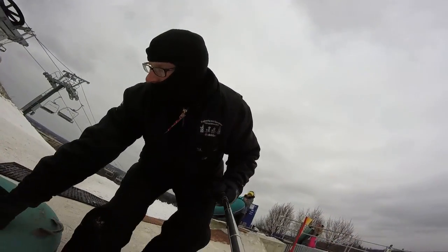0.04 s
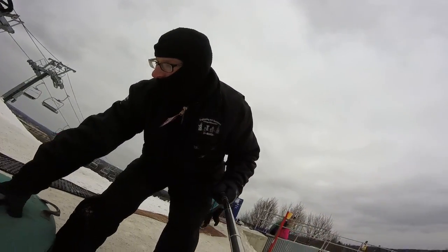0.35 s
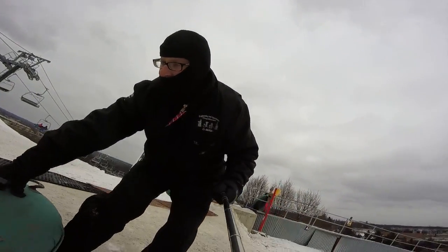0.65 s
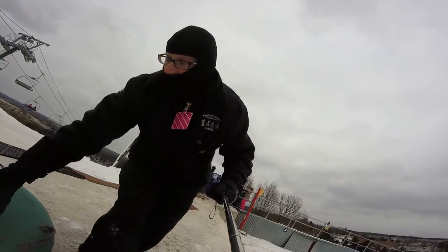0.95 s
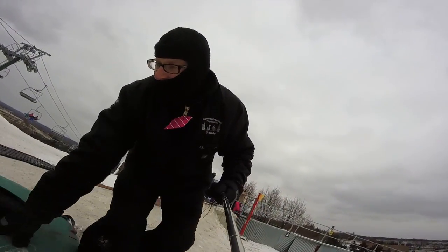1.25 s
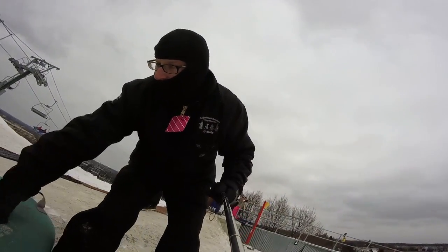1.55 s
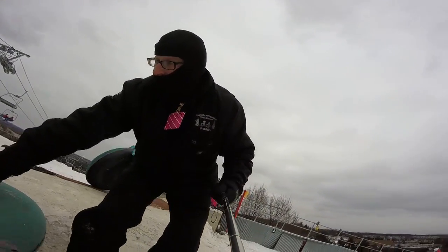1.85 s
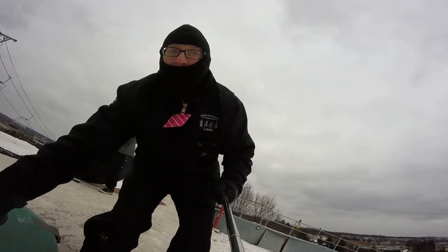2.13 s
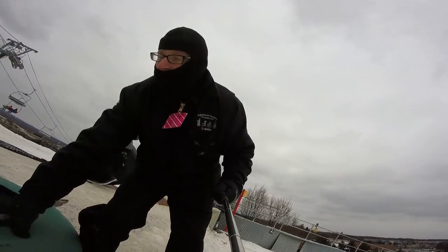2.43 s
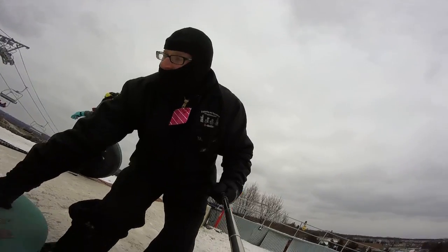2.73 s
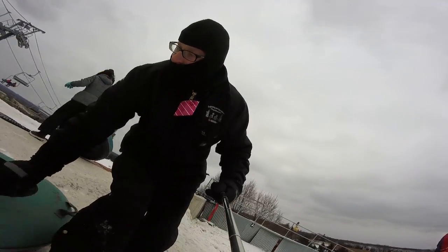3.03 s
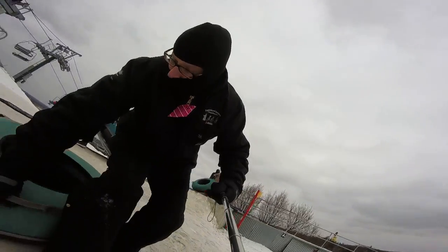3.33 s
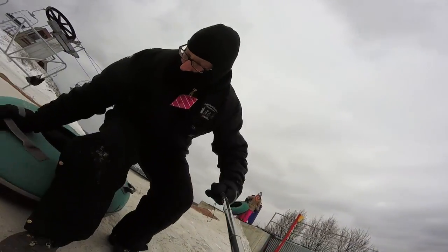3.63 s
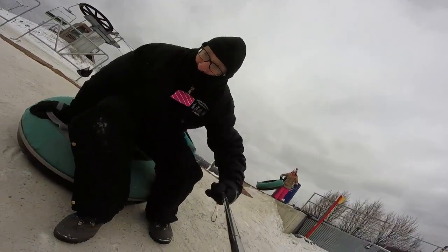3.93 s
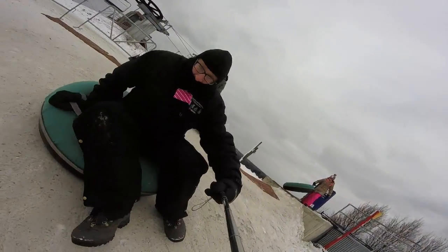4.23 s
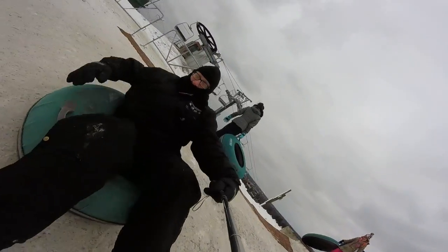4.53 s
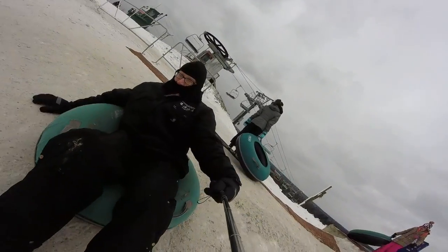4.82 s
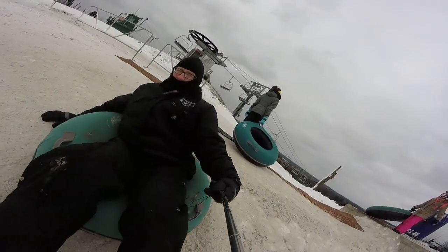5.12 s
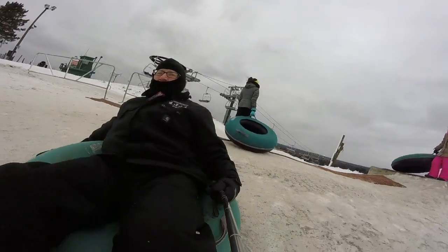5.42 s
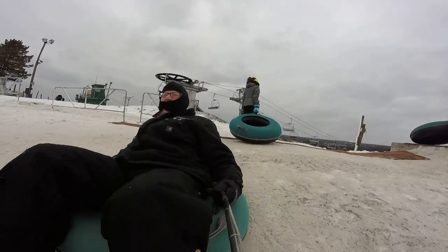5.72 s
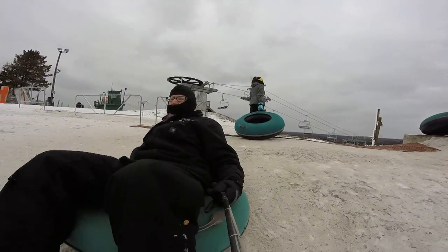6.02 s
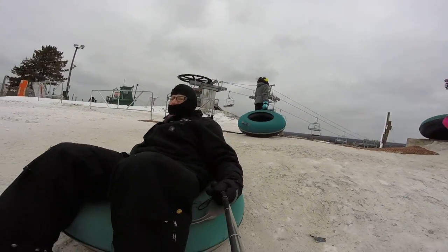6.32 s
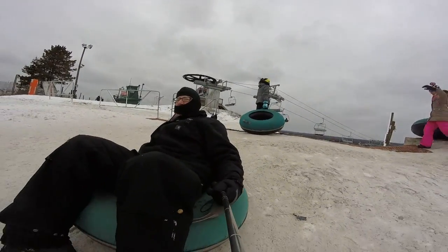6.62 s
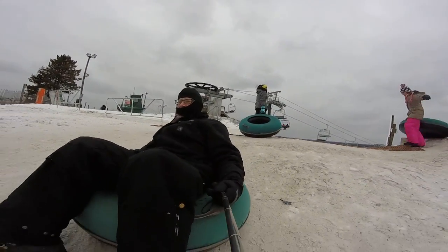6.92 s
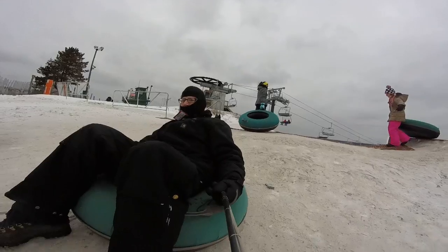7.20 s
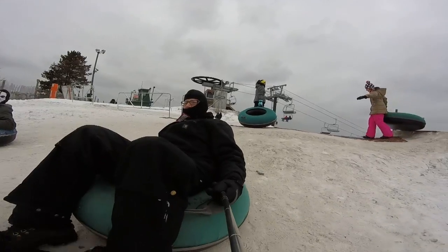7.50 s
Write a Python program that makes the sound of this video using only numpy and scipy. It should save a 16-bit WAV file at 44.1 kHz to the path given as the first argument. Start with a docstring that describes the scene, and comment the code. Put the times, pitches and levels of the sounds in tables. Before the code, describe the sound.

Boots crunch unevenly over packed snow close to the microphone, with crisp cracks of icy crust. The steps thin out, a handheld pole knocks and a snow suit rustles. A snow tube then rasps and groans under the rider's weight, thumps a few times and slides off with a grainy scrape. Wind rumbles on the microphone throughout, and a distant lift whines faintly in the first half.

```python
"""Boots crunch over packed snow, its crust fracturing in grains, as a rider pulls a snow tube along.
The rider sits down and pushes off: the tube's skin judders by stick-slip friction, then the tube glides
with a grainy hiss. The pole that carries the camera knocks and shudders in its bending mode, wind
rumbles and a distant lift whines. The camera's case resonates near 1.6 kHz and colours every noise."""
import sys
import numpy as np
from scipy.fft import rfft, irfft, next_fast_len
from scipy.io import wavfile
from scipy.ndimage import map_coordinates

SR = 44100
rng = np.random.default_rng(int(sys.argv[2]) if len(sys.argv) > 2 else 0)


def to_wav(sig):
    """Store sig (one row per channel, or 1-D mono) as 16-bit WAV at the path in sys.argv[1].

    Samples outside -1..1 are clipped; the rate is SR.
    """
    pcm = np.clip(np.atleast_2d(sig), -1, 1) * 32767
    pcm = np.round(pcm).astype(np.int16)
    wavfile.write(sys.argv[1], SR, pcm.T)  # frames by channels


N = 337665
TIME = np.arange(N) / SR
STEP_PRESS_S = 0.0068  # every step presses alike

# boot crunches: t/s, relative peak/dB, heel thud/dB, brightness/dB, rise/s
STEPS = [(0.393, -40, -8.5, -7, 0.0043), (0.49, -43.5, -14, -25, .007), (0.762, -41, -29, -14, .003),
         (0.84, -51, -19, -12, 0.011), (0.925, -45, -14, -8, .015), (0.97, -28.5, -3, -7.5, 0.0043),
         (0.998, -44, -8, -24, 0.0033), (1.024, -34.5, -25, -12, 0.0083), (1.12, -38, -25, -1, 0.011),
         (1.178, -43.5, -6, 1, 0.0075), (1.221, -34, -23, -6.5, 0.0085), (1.254, -42, -20, -8, .004),
         (1.275, -34.5, -6, -18, .002), (1.284, -42, -26, -10, 0.0027), (1.3, -40.5, -3, -16, 0.0076),
         (1.463, -33.5, -7, -11, .013), (1.577, -46.5, -16, -4, .006), (1.719, -46, -19, -3, 0.0055),
         (1.782, -36.5, -24, -14, .011), (1.86, -36, -17, -20, 0.0026), (1.904, -46, -20, -16, 0.0026),
         (1.944, -43.5, -21, -7, 0.0081), (1.965, -46, -20, -8, 0.0067), (2.026, -34.5, 0.5, -17, 0.0045),
         (2.038, -42, -5, 1, .005), (2.244, -30, -13, -15, 0.0023), (2.349, -36.5, -5, -22, 0.0032),
         (2.363, -32.5, -6, -9, .005), (2.41, -51.5, 3, 6, .004), (2.443, -50, -7, 0, .005),
         (2.452, -34.5, -8, -22, 0.0047), (3.315, -48.5, 3, -7, .005), (3.533, -45, 3.5, -15, .003),
         (3.83, -68, 5, -20, .004), (3.9, -64, 10, -27, .004), (4.413, -32.5, -31, -25, 0.0023)]
# spectra ahead of the case: f/Hz, relative level/dB
CRUNCH_SPECTRUM = [(150, 2.5), (420, 0.5), (600, -5), (820, -4), (1150, -6.5), (1500, 1.5), (1900, 2.5),
                   (2700, -1), (4000, -9.5), (6000, -21.5), (12000, -37)]  # coarse grains
CRYSTAL_SPECTRUM = [(1500, -13.5), (3000, 3), (4400, 1), (5400, -9), (6300, -6), (7100, -14), (8500, -10),
                    (10500, -12), (15000, -26)]  # loose snow crystals
LUMP_SPECTRUM = [(150, 11), (450, 0), (700, -4), (1100, -3), (1550, 1), (2000, -2.5), (2600, -7.5),
                 (3500, -4), (6000, -23), (14000, -40)]  # hard bits under the tube
RUMBLE_SPECTRUM = [(15, 6), (30, -9), (55, 2.5), (90, -7), (140, -12.5), (250, -14.5), (450, -21),
                   (900, -31), (3000, -58), (9000, -99)]  # low rumble of wind and tube


def boots(crunch_db=-10, crisp_db=-11, heel_db=-12, brush_db=-22, brush_s=0.038, tail_db=-15):
    """Brittle fracture: the sole brushes the snow, then breaks the crust in grains over a dull thud."""
    # heel impact: f/Hz, relative level/dB
    heel_spectrum = [(40, 13), (80, -17), (120, 3), (170, -2.5), (240, -6.5), (450, -1), (900, -9.5),
                     (2000, -38), (8000, -79)]
    sink_s, tail_t60 = 0.0025, 0.066
    crush, trickle, heel = np.zeros((3, N))
    for s, db, thud_db, bright_db, rise in STEPS:
        hold = rise + STEP_PRESS_S / 2
        brush = amp(brush_db) * burst(s - brush_s, brush_s, brush_s, tail_t60 / 3)
        loose = np.maximum(brush, amp(tail_db) * burst(s, rise, hold, tail_t60))
        crush += amp(db) * np.maximum(burst(s, rise, hold, t60=0.077), loose)
        trickle += amp(db + bright_db) * np.maximum(burst(s, rise, hold, t60=0.1), loose)
        heel += amp(db + thud_db) * burst(s, sink_s, 2 * sink_s, t60=0.21)
    crumble = amp(1.5 * wobble(350))  # the crust gives way in small collapses
    crust = amp(crunch_db) * crush * crumble * grains(rate=2200, spread_db=2.5)
    crystals = amp(crisp_db) * trickle * crumble * grains(rate=6000, spread_db=2.5)
    thud = through_case(amp(heel_db) * heel * rng.standard_normal(N), heel_spectrum)
    return through_case(crust, CRUNCH_SPECTRUM) + through_case(crystals, CRYSTAL_SPECTRUM) + thud


def crust_snaps(level_db=-7):
    """Sudden release of strain: a plate of ice breaks with one short, bright crack."""
    # breaks: t/s, relative peak/dB
    breaks = [(0.972, -26), (1.033, -36), (1.275, -37), (1.404, -27.5), (1.478, -35.5), (1.992, -38),
              (2.03, -35), (2.045, -41), (2.249, -30.5), (2.354, -32), (2.37, -34.5), (2.411, -36),
              (2.457, -35.5), (4.641, -36.5), (6.1053, -36)]
    # crack: f/Hz, relative level/dB
    spectrum = [(500, -11), (1500, 4.5), (2900, 9), (4500, 0.5), (7000, -12), (10000, -14), (15000, -46)]
    force = sum(amp(db) * burst(s, rise=0.0012, hold=0.00022, t60=0.019) for s, db in breaks)
    return amp(level_db) * through_case(force * rng.standard_normal(N), spectrum)


def footfalls(thud_hz=135.8, thud_rise_s=0.0032, packing_db=-10, grit_db=-23):
    """Compaction: each step packs the snow with a low thud, and loose grit crackles on after it."""
    weight, scatter = np.zeros((2, N))
    for s, db, thud_db, bright_db, rise in STEPS:
        weight += amp(db + thud_db) * burst(s, thud_rise_s, 2 * thud_rise_s, t60=0.34)
        scatter += amp(db + bright_db / 2) * burst(s, rise, rise + STEP_PRESS_S, t60=0.2)
    thud = amp(packing_db) * weight * sine(thud_hz * np.exp(0.19 * wobble(60)))
    grit = amp(grit_db) * scatter * grains(rate=330, spread_db=-0.5)
    return thud + through_case(grit, CRYSTAL_SPECTRUM)


def skin_rub(slip_hz=622.6, scatter=0.24, wander=0.2, grit=0.43, echo_s=0.0009, rumble_db=-1):
    """Stick-slip friction: the loaded skin rasps unevenly, and the hollow tube groans and rumbles."""
    # short rubs: t/s, level/dB, length/s, relative groan/dB
    rubs = [(4.43, -56, .06, -22), (4.476, -52, 0.02, -3), (4.807, -54.5, 0.07, -27),
            (5.151, -47, 0.022, -2), (5.18, -46, 0.017, 0), (5.208, -39, 0.012, -5),
            (5.225, -35, 0.0042, -20), (5.252, -44, 0.0054, -4), (5.262, -39.5, 0.006, -9),
            (5.29, -52, 0.012, -3), (5.337, -52.5, 0.046, -6), (5.42, -38.5, .004, -3),
            (5.573, -41, 0.0046, -14), (5.9, -61, 0.15, 1)]
    # long rub as the rider settles and shoves off: t/s, level/dB
    shove = [(5.385, -49.5), (5.42, -37), (5.445, -36), (5.52, -37.5), (5.545, -37), (5.58, -36.5),
             (5.62, -40), (5.65, -44), (5.675, -56)]
    # rasping skin and hollow interior: f/Hz, relative level/dB
    skin_spectrum = [(50, -6), (90, 17.5), (190, -0.5), (330, 4), (470, 3.5), (620, 1), (850, -12.5),
                     (1050, -6.5), (1400, -0.5), (1620, 4), (1780, -5), (2050, 5), (2400, -4.5), (2800, -5),
                     (3200, -20.5), (3750, -12), (5200, -46), (14000, -56)]
    groan_spectrum = [(150, -25), (280, -7), (400, -2), (490, 1.5), (600, -15.5), (750, -18), (1000, -42),
                      (5000, -74)]
    pressure, hollow = np.zeros((2, N))
    for s, db, length, groan_db in rubs:
        # a longer rub builds and lets go more slowly
        stroke = amp(db) * burst(s, rise=0.0043 + 0.081 * length, hold=length, t60=0.064 + 0.57 * length)
        pressure = np.hypot(pressure, stroke)
        hollow = np.hypot(hollow, amp(groan_db) * stroke)
    pressure = np.hypot(pressure, swell(shove))
    cycles = np.cumsum(slip_hz * np.exp(scatter * wobble(900) + wander * wobble(60))) / SR
    slips = np.diff(np.floor(cycles), prepend=0) * amp(2 * rng.standard_normal(N))
    friction = unit(unit(slips - slips.mean()) + grit * rng.standard_normal(N))
    # the rubbed patch echoes between its edges; the delay shifts as it changes size
    delay = echo_s * np.exp(0.2 * wobble(25))
    friction = unit(friction + 0.35 * np.interp(TIME - delay, TIME, friction))
    judder = amp(wobble(130))
    rasp = judder * through_case(pressure * friction, skin_spectrum)
    rumble = amp(rumble_db) * through_case(pressure * rng.standard_normal(N), RUMBLE_SPECTRUM)
    groan = through_case(hollow * rng.standard_normal(N), groan_spectrum)
    return rasp + rumble + groan


def tube_bumps(air_hz=94, thump_db=-3, flap_db=-10):
    """Cavity resonance: a bump rings the air in the tube for a few cycles and flaps its cover."""
    # tube against pole: t/s, relative peak/dB
    bumps = [(0.998, -47), (2.077, -40), (4.391, -38.5), (5.338, -27.5), (5.382, -28), (5.9, -50),
             (6.006, -25), (6.06, -26)]
    # flapping cover: f/Hz, relative level/dB
    spectrum = [(40, -7), (85, 12), (160, -5), (300, -9.5), (470, -17), (700, -49), (2000, -24.5),
                (8000, -67)]
    thumps, flaps = np.zeros((2, N))
    for s, db in bumps:
        air_mode = np.sin(2 * np.pi * air_hz * (TIME - s))
        thumps += amp(db) * burst(s, rise=0.0045, hold=0, t60=0.13) * air_mode
        flaps += amp(db) * burst(s, rise=0.0038, hold=0, t60=0.079)
    return amp(thump_db) * thumps + amp(flap_db) * through_case(flaps * rng.standard_normal(N), spectrum)


def tube_slide(push_off_s=5.57, gather_s=0.95, scrape_db=-3, powder_db=-67, glide_db=-62):
    """Sliding friction on snow: a coarse scrape, a fine hiss, and a sheen as the tube gathers speed."""
    # drag while pulled along, halted, then gliding: t/s, relative level/dB
    drag_levels = [(0, -58), (.7, -60), (.95, -51.5), (1.1, -58.5), (1.95, -56), (2.6, -57.5), (3.4, -59),
                   (3.95, -65), (4.4, -51.5), (4.58, -61.5), (5.1, -56.5), (5.3, -53), (6.15, -55),
                   (6.9, -57.5), (7.66, -55.5)]
    # scrape, hiss and sheen: f/Hz, relative level/dB
    scrape_spectrum = [(150, 5.5), (400, -5.5), (800, 0), (1300, -1), (1700, 4), (2300, 0), (3200, -5.5),
                       (4500, -13), (8000, -33.5)]
    powder_spectrum = [(1500, -21), (3000, 4.5), (4300, 2.5), (5400, -2.5), (6300, -7.5), (7100, -5.5),
                       (8500, -5.5), (10500, -11.5), (15000, -27.5)]
    glide_spectrum = [(150, 5), (380, 8.5), (700, -3.5), (1100, 2), (1600, -6), (3300, 0.5), (5000, -12),
                      (6200, -11), (7200, -25), (9000, -16), (15000, -45)]
    drag = swell(drag_levels)
    powder = unit(drag ** 0.25)  # grows by 1 dB for 4 dB of drag
    clumps = amp(1.08 * wobble(60))
    speed = np.clip((TIME - push_off_s) / gather_s, 0, 1)
    coarse = through_case(drag * clumps * grains(rate=2500, spread_db=1.5), scrape_spectrum)
    fine = through_case(powder * clumps * grains(rate=8000, spread_db=2.5), powder_spectrum)
    sheen = through_case(speed * clumps * grains(rate=8000, spread_db=2), glide_spectrum)
    return amp(scrape_db) * coarse + amp(powder_db) * fine + amp(glide_db) * sheen


def pole_knocks(blow_db=12, chatter_db=-9):
    """Structure-borne sound: a hard blow and its brief chatter travel up the pole into the case."""
    # knocks on handle and pole: t/s, relative peak/dB
    knocks = [(2.028, -39.5), (2.461, -34), (3.478, -32), (3.96, -46), (4.417, -36), (4.497, -35.5),
              (4.663, -26.5), (4.686, -41)]
    # struck pole: f/Hz, relative level/dB
    spectrum = [(150, -19), (500, -7), (720, 2.5), (930, -11), (1200, -2), (1550, 3), (1950, 5.5),
                (2700, -5), (3300, -18), (4000, -16), (6000, -48), (14000, -41)]
    blows, chatter = np.zeros((2, N))
    for s, db in knocks:
        blows[round(s * SR)] = amp(db + blow_db)
        chatter += amp(db + chatter_db) * burst(s, rise=0.00049, hold=0.00026, t60=0.029)
    return through_case(blows + chatter * rng.standard_normal(N), spectrum)


def pole_shudder(sway_hz=32, wander=0.099, tremble_db=-1.5, flex_hz=54, flex_db=-12):
    """Bending vibration: the pole trembles in its lowest mode; jolts swing it and flex its mount."""
    # jolts: t/s, peak/dB, length/s
    jolts = [(0.263, -44.5, 0.15), (0.59, -40, 0.34), (1.007, -41, 0.24), (1.768, -43, 0.16),
             (2.048, -43.5, 0.23), (4.198, -25, 0.11), (4.339, -28.5, 0.15), (4.5, -37.5, 0.22),
             (4.778, -33, 0.036), (4.873, -33, 0.058), (4.96, -34, 0.046), (5.152, -33, 0.092),
             (5.286, -36.5, 0.36), (5.746, -35.5, 0.13), (5.861, -24, 0.062), (5.986, -27, 0.085),
             (6.249, -34, .19), (6.675, -38, 0.2), (6.882, -36.5, 0.14), (7.396, -31.5, 0.076),
             (7.541, -32, 0.085)]
    # tremble in the hand: t/s, relative level/dB
    tremble = [(0, -40.5), (2.4, -45.5), (3.3, -44), (3.7, -42.5), (4.6, -48), (5.5, -37), (6.6, -42.5),
               (7.66, -47.5)]
    swing = np.zeros(N)
    for s, db, length in jolts:
        swing = np.hypot(swing, amp(db) * burst(s, rise=0.036, hold=length, t60=0.19))
    sway = sine(sway_hz * np.exp(wander * wobble(14) + wander * wobble(50)))
    flex = amp(flex_db) * shiver(flex_hz, width_hz=18)
    return swing * (sway + flex) + amp(tremble_db) * swell(tremble) * shiver(sway_hz, width_hz=18)


def lump_ticks(level_db=-4):
    """Brief impact: a hard lump of snow passing under the tube gives a light, dry tick."""
    # lumps: t/s, relative peak/dB
    lumps = [(5.815, -52), (5.912, -44), (6.117, -38), (6.123, -49), (6.199, -43), (6.215, -45),
             (6.264, -45), (6.333, -45), (6.643, -47), (6.836, -35.5), (7.471, -37.5)]
    force = sum(amp(db) * burst(s, rise=0.00073, hold=0.0016, t60=0.022) for s, db in lumps)
    return amp(level_db) * through_case(force * grains(rate=9000, spread_db=-3), LUMP_SPECTRUM)


def ice_pellets(level_db=-2, clump_db=3):
    """Shot noise: loose pellets of ice scrape and tick in clumps under the gliding tube."""
    # pellets after the push-off: t/s, relative level/dB
    levels = [(5.7, -75), (5.95, -56), (6.25, -60), (6.45, -64), (7.1, -65), (7.66, -55.5)]
    pellets = grains(rate=450, spread_db=2.5)
    clumps = amp(level_db + clump_db * wobble(40))
    return through_case(clumps * swell(levels) * pellets, LUMP_SPECTRUM)


def seat_scrape(clump_db=3):
    """Roughness noise: the rider's stiff suit catches on the cover's weave in coarse grains."""
    # sitting down: t/s, level/dB
    levels = [(4.27, -70), (4.37, -60), (4.44, -55), (4.49, -62), (4.53, -72)]
    clumps = amp(clump_db * wobble(110))
    return through_case(clumps * swell(levels) * grains(rate=900, spread_db=2), CRUNCH_SPECTRUM)


def snow_suit(flicker_db=3.5, tick_db=-4):
    """Friction and buckling: cloth swishes in fine grains, and stiff folds flip with a crisp tick."""
    # swishes: t/s, length/s, level/dB
    swishes = [(0.153, 0.44, -66), (.84, 0.15, -66), (1.102, 0.33, -66), (1.878, 0.14, -63),
               (2.503, 0.078, -65), (3.038, 0.21, -64.5), (3.218, 0.19, -60.5), (4.295, 0.15, -58.5)]
    # flipping folds: t/s, relative peak/dB
    crinkles = [(3.085, -54), (3.181, -52.5), (3.198, -50), (4.544, -55.5), (4.874, -50), (5.034, -50.5)]
    # cloth: f/Hz, relative level/dB
    spectrum = [(1000, 3.5), (3000, 10.5), (5000, 2), (6300, -1.5), (7700, -2.5), (8800, -6), (11000, -10),
                (15000, -23)]
    motion = sum(amp(db) * np.sin(np.pi * np.clip((TIME - s) / length, 0, 1))
                 for s, length, db in swishes)
    folds = sum(amp(db + tick_db) * burst(s, rise=0.004, hold=0.008, t60=0.025) for s, db in crinkles)
    force = motion * amp(flicker_db * wobble(90)) + folds
    return through_case(force * grains(rate=5000, spread_db=2), spectrum)


def wind(buffet_db=1, puff_db=2, air_db=-61):
    """Turbulence: fluttering puffs buffet the case over the steady rush of the open hill."""
    # wind on the case: t/s, relative level/dB
    levels = [(0, -54), (1.3, -52), (1.7, -52.5), (2.5, -51.5), (3.4, -49.5), (3.7, -51.5), (4.35, -48),
              (4.7, -53), (5.3, -47), (6.6, -51.5), (7.66, -49.5)]
    # open air: f/Hz, relative level/dB
    air_spectrum = [(100, 10), (200, 1), (400, 0), (700, -1.5), (1200, -5), (2000, -3.5), (3500, -12),
                    (5500, -25), (7000, -23.5), (9000, -21), (12000, -25.5), (15000, -31)]
    flutter = 1 + 0.55 * np.tanh(1.5 * wobble(28))
    puffs = amp(puff_db * np.tanh(wobble(9)))
    eddies = unit(flutter * puffs * rng.standard_normal(N))
    buffet = amp(buffet_db) * through_case(swell(levels) * eddies, RUMBLE_SPECTRUM)
    rush = amp(air_db + wobble(5.4)) * through_case(rng.standard_normal(N), air_spectrum)
    return buffet + rush


def squeaks(level_db=2, waver=0.0028):
    """Frequency modulation: faint, short tones glide and waver near the case's 1.6 kHz resonance."""
    # squeaks: t/s, length/s, start f/Hz, end f/Hz, relative level/dB
    glides = [(1.768, 0.16, 1460, 1500, -58), (1.936, 0.13, 1707, 1670, -62),
              (2.825, 0.15, 1670, 1690, -63), (4.828, 0.06, 1660, 1694, -54.5),
              (4.954, 0.071, 1518, 1580, -56), (5.075, 0.092, 1734, 1630, -58),
              (5.325, 0.037, 1564, 1645, -47), (7.37, 0.094, 1690, 1645, -54.5)]
    out = np.zeros(N)
    unsteady = 1 + waver * wobble(80)
    for s, length, start_hz, end_hz, db in glides:
        span = slice(int(s * SR), int((s + length) * SR))
        progress = (TIME[span] - s) / length
        pitch = (start_hz + progress * (end_hz - start_hz)) * unsteady[span]
        out[span] += amp(db) * np.sin(np.pi * progress) * sine(pitch)
    return amp(level_db) * out


def lift_whine(early_db=1):
    """Tonal machine noise: the distant lift sings on one set of partials, later on a higher pair."""
    # the two whines: t/s, relative level/dB
    early = [(0, -60.5), (.3, -62.5), (.5, -70), (.9, -71)]
    late = [(1.9, -55.5), (2.5, -59.5), (3.05, -58), (3.3, -79), (3.75, -57)]
    # their partials: f/Hz, relative level/dB, glide/(Hz/s)
    early_partials = [(1173, -18, -13), (1350, -23, -13), (1462, 3.5, -15), (1760, -8, -17.5),
                      (2153, -17, -16)]
    late_partials = [(1580, -7.5, -3), (1687, -7.5, -22)]
    first = amp(early_db) * tones(early, early_partials, waver=0.00087)
    return first + tones(late, late_partials, waver=0.0013)


def thin_hiss():
    """Narrow-band noise: a faint hiss near 7.7 kHz swells and fades at the start."""
    # swell: t/s, level/dB
    levels = [(0, -84), (.3, -76), (.58, -83)]
    # band: f/Hz, relative level/dB
    spectrum = [(6500, -37), (7400, -11), (7700, 10), (8050, -7), (9000, -16), (14000, -45)]
    return through_case(swell(levels) * rng.standard_normal(N), spectrum)


def through_case(x, spectrum):
    """Source and filter: a spectrum and the case's resonances colour x; white noise keeps its power."""
    # case resonances: f/Hz, width/Hz, level/dB relative to the direct sound
    modes = [(461, 56, -4.5), (1505, 212, 4.5), (1632, 81, 4), (2235, 79, -4), (2477, 85, 0),
             (2870, 35, -13), (2900, 24, -3), (4246, 91, -0.5), (4737, 150, 1), (6125, 710, 6.5)]
    m = 2 * next_fast_len(N // 2 + SR // 4)
    f = np.fft.rfftfreq(m, 1 / SR)
    hz, db = np.transpose(spectrum)
    colour = amp(np.interp(np.log(f + 1), np.log(hz), db))
    ring = 1 + sum(2 * amp(level) ** 2 / (1 + (2 * (f - centre) / width) ** 2) ** 2
                   for centre, width, level in modes)
    gain = unit(colour * np.sqrt(ring))
    # minimum phase: the ringing follows its cause
    cepstrum = irfft(np.log(gain + 1e-6))
    cepstrum[1:m // 2] *= 2
    cepstrum[m // 2 + 1:] = 0
    return irfft(rfft(x, m) * np.exp(rfft(cepstrum)), m)[:N]


def grains(rate, spread_db):
    """A Poisson process: on average rate clicks a second, of uneven size, rms 1."""
    snaps = rng.random(N) < rate / SR
    size = amp(spread_db * np.minimum(rng.exponential(size=N), 4))
    return unit(snaps * size * rng.choice([-1, 1], N))


def burst(s, rise, hold, t60):
    """Contact force from time s: a linear rise, then exponential decay from s + hold; all in seconds."""
    force = np.zeros(N)
    span = slice(int(s * SR), int((s + abs(hold) + 2 * t60) * SR))
    t = TIME[span] - s
    force[span] = np.clip(t / rise, 0, 1) * amp(-60 * np.maximum(t - hold, 0) / t60)
    return force


def tones(levels, partials, waver):
    """Common modulation: thin partials waver together and slowly sag in pitch."""
    age = TIME - levels[0][0]
    unsteady = 1 + waver * wobble(14)
    return swell(levels) * sum(amp(db + 0.66 * wobble(21)) * sine((hz + glide * age) * unsteady)
                               for hz, db, glide in partials)


def shiver(hz, width_hz):
    """Random excitation of one mode: it swells, stalls and drifts in phase."""
    phase = 2 * np.pi * hz * TIME
    return (wobble(width_hz) * np.sin(phase) + wobble(width_hz) * np.cos(phase)) / np.sqrt(2)


def sine(hz):
    """A tone whose phase is the integral of its frequency."""
    return np.sin(2 * np.pi * np.cumsum(hz) / SR)


def wobble(rate):
    """A smooth random curve, rate knots a second."""
    coarse = TIME[::16]
    knots = rng.standard_normal(int(N * rate / SR) + 4)
    return np.interp(TIME, coarse, map_coordinates(knots, [coarse * rate]))


def swell(rows):
    """An envelope from rows of t/s, level/dB, fading to silence outside them."""
    s, db = np.transpose(rows)
    fade = np.interp(TIME, [s[0] - .05, s[0], s[-1], s[-1] + .05], [0, 1, 1, 0])
    return fade * amp(np.interp(TIME, s, db))


def amp(db):
    """Decibels to gain."""
    return 10 ** (np.asarray(db) / 20)


def unit(x):
    """Scale to rms 1."""
    return x / np.sqrt(np.mean(x ** 2) + 1e-20)


def scene():
    """Superposition: all sources add at the one microphone."""
    walking = boots() + crust_snaps() + footfalls()
    impacts = pole_knocks() + lump_ticks() + tube_bumps()
    friction = seat_scrape() + skin_rub() + tube_slide() + ice_pellets() + snow_suit()
    background = thin_hiss() + pole_shudder() + wind() + lift_whine() + squeaks()
    return (walking + impacts + friction + background)[None]


def record(dry):
    """Band limiting: the camera keeps nothing above its top frequency."""
    top_hz = 15100
    m = next_fast_len(N + SR // 4)
    passband = np.fft.rfftfreq(m, 1 / SR) < top_hz
    return irfft(rfft(dry, m) * passband, m)[:, :N]


dry = scene()
out = record(dry)
to_wav(out)
```